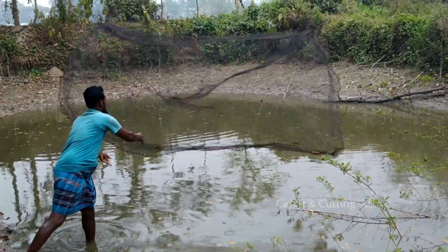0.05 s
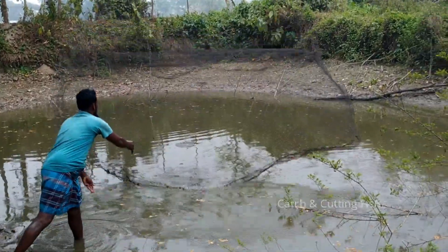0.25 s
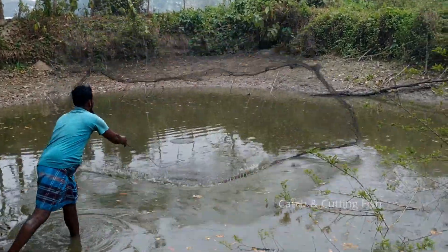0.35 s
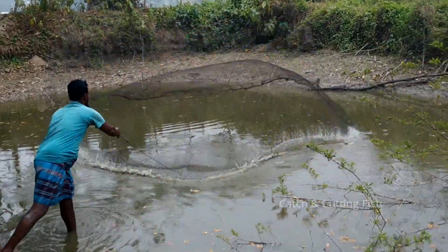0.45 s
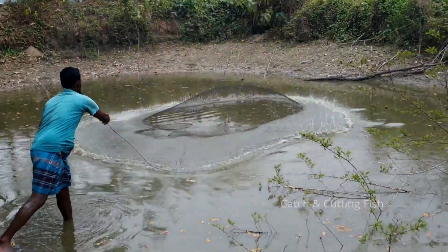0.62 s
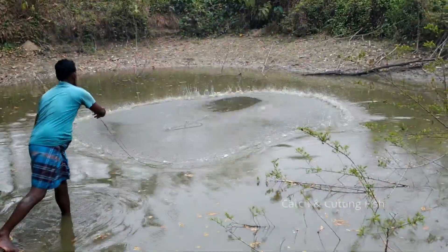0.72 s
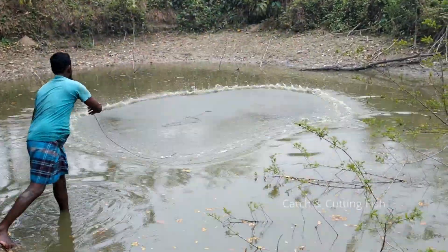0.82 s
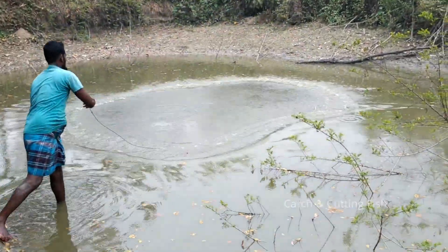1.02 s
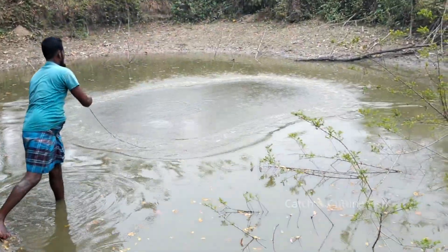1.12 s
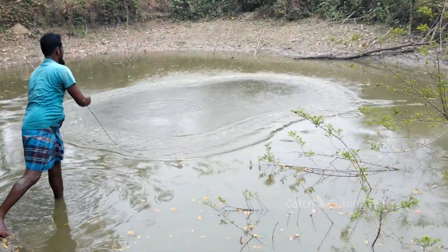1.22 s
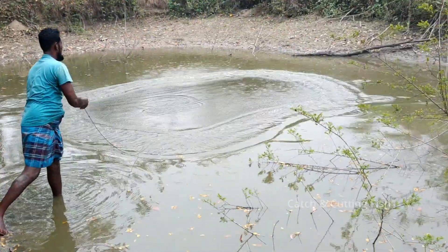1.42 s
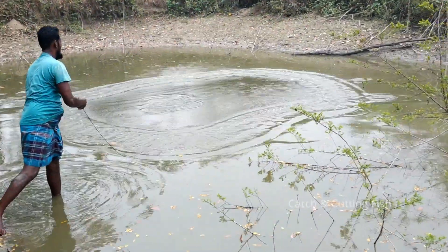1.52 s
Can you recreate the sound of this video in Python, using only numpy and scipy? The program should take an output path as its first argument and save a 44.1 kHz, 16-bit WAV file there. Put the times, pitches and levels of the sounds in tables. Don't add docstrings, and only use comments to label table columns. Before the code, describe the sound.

A thrown fishing net lands on a pond: bright droplet hiss and flat slaps over dense mid-pitched bubbling, fading to scattered plops and ticks, outdoors with faint bank echoes, small stereo recorder, left side duller.

```python
import sys
import numpy as np
from scipy import signal
from scipy.fft import rfft, irfft
from scipy.io import wavfile

SR = 44100
rng = np.random.default_rng(int(sys.argv[2]) if len(sys.argv) > 2 else 0)


def boost_factor(decibels):
    exponent = np.asarray(decibels, float) / 20
    return 10 ** exponent


def store_wav(level_fs):
    pcm = np.round(np.clip(np.atleast_2d(level_fs), -1, 1) * 32767)
    wavfile.write(sys.argv[1], SR, pcm.T.astype(np.int16))


N = 68355
LEFT_LAG_S = 0.00023


def in_time(rows):
    s, *columns = np.transpose(rows)
    return [np.interp(np.arange(N) / SR, s, column) for column in columns]


def at_hz(points, hz):
    table_hz, value = np.array(points).T
    return np.interp(np.log(np.maximum(hz, 1)), np.log(table_hz), value)


def rms_one(x):
    return x / np.sqrt(np.mean(x ** 2) + 1e-20)


def drift(rate):
    r = np.exp(-2 * np.pi * rate / SR)
    wander = signal.lfilter([1], [1, -2 * r, r * r], rng.standard_normal(N + SR))
    return rms_one(wander[SR:])


def coloured(x, spectrum):
    weight = boost_factor(at_hz(spectrum, np.fft.rfftfreq(N, 1 / SR)))
    return rms_one(irfft(rfft(x) * weight, N))


def brightened(x, db_per_octave, pivot_hz):
    hz = np.fft.rfftfreq(N, 1 / SR)
    octave, spectrum = np.log2(np.maximum(hz, 1) / pivot_hz), rfft(x)
    centres = [-1.5, -.5, .5, 1.5]
    out = 0
    for centre, corner in zip(centres, np.eye(4)):
        part = irfft(spectrum * np.interp(octave, centres, corner), N)
        out = out + boost_factor(centre * db_per_octave) * part
    return out


# frequency in Hz, left-right correlation (0 to 1).
PORT_LIKENESS = [(60, 0.8), (300, 1), (700, 0.66), (1400, 0.099), (3000, 0.19), (15000, 0.047)]


def noise(spectrum, patchy_db, rate):
    out, together = 0, drift(rate * 2)
    edges = 30 * 2 ** np.arange(0, 9.6, .5)
    white = rng.standard_normal((2, 2, N))
    for k, (low, high) in enumerate(zip(edges, np.minimum(edges[1:], .45 * SR))):
        band = signal.butter(2, [low, high], "band", fs=SR, output="sos")
        mid, side = signal.sosfilt(band, white[k % 2])
        alike = np.clip(at_hz(PORT_LIKENESS, np.sqrt(low * high)), 0, 1)
        stereo = np.sqrt(1 + alike) * mid + np.sqrt(1 - alike) * side * [[1], [-1]]
        flicker = boost_factor(patchy_db * (0.68 * together + drift(rate)))
        out = out + flicker * stereo
    return coloured(out, spectrum)


def grains(per_s, low_hz, high_hz, cycles, spread_db, spectrum, count=24):
    size = boost_factor(spread_db * np.minimum(rng.exponential(1, N), 4)) * rng.choice([-1, 1], N)
    born = size * (rng.random(N) < per_s * boost_factor(2 * drift(60)) / SR)
    dealt = rng.integers(0, count, N)
    lags = rng.integers(-7, 8, count)
    out = np.zeros((2, N))
    for k, hz in enumerate(np.geomspace(low_hz, high_hz, count)):
        r, w = boost_factor(-60 * hz / (cycles * SR)), 2 * np.pi * hz / SR
        clicks = born * (dealt == k) + 1e-18
        rung = signal.lfilter([1, 0, -1], [1, -2 * r * np.cos(w), r * r], clicks)
        out += np.sqrt(hz) * np.array([np.roll(rung, lags[k]), rung])
    return coloured(out / np.sqrt(high_hz), spectrum)


def bubbles(rows, cycles, rise, attack_cycles):
    out = np.zeros(N + SR)
    for s, db, hz in rows:
        turns = np.arange(int(cycles * SR / hz)) * hz / SR
        shape = (1 - np.exp(-turns / attack_cycles)) * boost_factor(-60 * turns / cycles)
        ring = shape / shape.max() * np.sin(2 * np.pi * turns * (1 + rise * turns))
        i = int(s * SR)
        out[i:i + len(turns)] += boost_factor(db) * ring
    return out[:N]


# frequency in Hz, spectral level in dB per Hz.
AIR_COLOUR = [(30, -100), (90, -10), (190, 5), (330, -6), (850, -12), (1600, -13.5), (2250, -5),
              (4500, -15.5), (16500, -37.5)]
# frequency in Hz, left minus right in dB before the ports.
AIR_LEAN = [(300, 0), (1200, 2), (2250, 10.5), (3200, 0), (4700, 0), (9000, 13)]


def air():
    left_db = at_hz(AIR_LEAN, np.fft.rfftfreq(N, 1 / SR))
    lean = boost_factor(np.outer([.5, -.5], left_db))
    return boost_factor(-48.5) * irfft(rfft(noise(AIR_COLOUR, patchy_db=1.4, rate=11.4)) * lean, N)


# start in seconds, peak level in dB, pitch in Hz.
LEG_GULPS = [
    (.03, -43.5, 209),
    (.075, -44.5, 293),
    (.1, -44.5, 405),
    (.64, -43.5, 185.4),
    (1.08, -50, 221),
]


def gulps():
    return bubbles(LEG_GULPS, cycles=33.0, rise=0.0234, attack_cycles=0.59)


# start in seconds, level in dB, centre frequency in Hz, decay in seconds.
DROPLET_TICKS = [(.207, -51, 12000, .008), (.223, -43, 6100, .006), (.251, -33.5, 7000, .003),
                 (0.287, -31, 3000, .003), (.356, -34, 5000, 0.0038), (.372, -32, 4800, 0.0039),
                 (0.388, -34, 5400, 0.0045), (.529, -27, 6460, .0015), (.5555, -28.5, 12900, .002),
                 (0.557, -31, 6000, 0.0057), (.576, -50, 3700, 0.0027), (.595, -36, 8900, .006),
                 (.735, -44.5, 11000, .003), (.866, -50, 6000, 0.0051), (0.909, -49, 9500, .003),
                 (1.041, -55, 6500, .004), (1.158, -53, 14000, 0.0026), (1.159, -46.5, 6800, 0.0027),
                 (1.215, -45.5, 12500, 0.0016), (1.278, -50.5, 4460, 0.012), (1.343, -52, 4940, 0.0065),
                 (1.401, -52, 6000, 0.0055), (1.477, -44.5, 12500, 0.0017), (1.496, -43, 4940, .003),
                 (1.496, -51, 8000, 0.0027), (1.536, -45, 4400, 0.0053)]


def ticks():
    out, t = np.zeros((2, N + SR)), np.arange(1200) / SR
    for s, db, hz, decay in DROPLET_TICKS:
        band = signal.butter(2, [hz / 1.4, min(hz * 1.4, .45 * SR)], "band", fs=SR, output="sos")
        burst = rms_one(signal.sosfilt(band, rng.standard_normal((2, len(t)))))
        i = int(s * SR)
        out[:, i:i + len(t)] += boost_factor(db) * burst * np.exp(-t / decay)
    return out[:, :N]


# start in seconds, peak level in dB, pitch in Hz.
BRIGHT_DROPS = [
    (.164, -36.5, 2660),
    (.232, -35, 2530),
    (1.407, -52, 2520),
    (1.484, -44, 1580),
    (1.3, -50, 2540),
    (1.484, -59, 2340),
]
# start in seconds, peak level in dB, pitch in Hz.
RINGING_DROP = [
    (1.339, -43, 2150),
]


def drops():
    ringing = bubbles(RINGING_DROP, cycles=230, rise=.0001, attack_cycles=6)
    centred = np.array([np.roll(ringing, -int(LEFT_LAG_S * SR)), ringing])
    return centred + bubbles(BRIGHT_DROPS, cycles=84.0, rise=0.00023, attack_cycles=7.3)


# start in seconds, level in dB, decay in seconds.
RIM_SLAPS = [
    (0.287, -30.5, 0.02),
    (0.354, -34.5, 0.012),
    (0.576, -36, 0.022),
    (0.626, -36.5, 0.043),
    (.849, -57, 0.0072),
    (0.883, -33.5, 0.0074),
    (1.151, -43, 0.0067),
    (1.275, -55, 0.045),
    (1.492, -39.5, 0.0091),
    (1.532, -50.5, 0.017),
]


def slaps():
    t = np.arange(N) / SR
    level = 0
    for s, db, decay in RIM_SLAPS:
        onset = np.clip((t - s) / 0.0024, 0, 1)
        level = level + boost_factor(db) * onset * np.exp(-np.maximum(t - s, 0) / decay)
    colour = [(700, -25), (1600, -2), (2500, -1), (4500, -9), (9000, -30)]
    return level * noise(colour, patchy_db=1.2, rate=40.0)


# time in seconds, level in dB, brightness in dB per octave.
SPRAY_COURSE = [(0, -53.5, 0), (.2, -58.5, -2), (.225, -44.5, 3), (.255, -36.5, 2.5), (.28, -39, 1.8),
                (.36, -36.5, 1), (.41, -38, 3), (.49, -41, 0.8), (.546, -38, 2.5), (.556, -33, 4.5),
                (.605, -35.5, 4.5), (.63, -39.5, -1), (.71, -46.5, 2.5), (.8, -49, -0.5),
                (.885, -47.5, 0.5), (.99, -52, -1.5), (1.2, -57.5, 2.5), (1.47, -57, -1), (1.485, -51.5, 2),
                (1.55, -48, -0.5)]
# frequency in Hz, spectral level in dB per Hz.
SPRAY_SPECTRUM = [(900, -17), (1400, -4), (2500, -2), (3100, -4), (4000, -2.5), (7500, -10.5), (12000, -15),
                  (16500, -20)]


def spray():
    level_db, tilt = in_time(SPRAY_COURSE)
    hiss = boost_factor(0.5) * noise(SPRAY_SPECTRUM, patchy_db=1.5, rate=19.0)
    fizz = boost_factor(-4.5) * grains(5000, 1250, 12800, cycles=3.6, spread_db=7.8, spectrum=SPRAY_SPECTRUM)
    return boost_factor(level_db) * brightened(hiss + fizz, tilt, pivot_hz=6660)


# time in seconds, level in dB, brightness in dB per octave.
PLUNGE_COURSE = [(0, -50, -4), (.2, -60, 2), (.281, -36.5, 6), (.285, -30, -4.5), (.34, -31.5, 4.5),
                 (.4, -34.5, 2), (.45, -31, 4), (.5, -28, 4), (.545, -36, 9), (.56, -29, 2),
                 (.642, -28.5, -0.5), (.69, -48, 13.5), (.78, -48, 11.5), (.86, -34, 3.5), (.92, -41.5, 0),
                 (.95, -48, 10), (1.15, -50.5, -1), (1.22, -70, 0)]
# frequency in Hz, spectral level in dB per Hz.
PLUNGE_SPECTRUM = [(130, -42), (220, -10.5), (341, -23), (384, -14), (686, -6), (835, -8.5), (1110, -9),
                   (1540, -17.5), (3000, -25), (3900, -66), (6600, -120)]


def plunge():
    level_db, tilt = in_time(PLUNGE_COURSE)
    wash = boost_factor(-8) * noise(PLUNGE_SPECTRUM, patchy_db=-2.0, rate=36.0)
    crowd = boost_factor(-15) * grains(500, 356, 2360, cycles=24, spread_db=3.6, spectrum=PLUNGE_SPECTRUM)
    return boost_factor(level_db) * brightened(wash + crowd, tilt, pivot_hz=796)


# start in seconds, peak level in dB, pitch in Hz.
FLIGHT_PLOPS = [
    (0, -49, 645),
    (.027, -54, 544),
    (.04, -47, 674),
    (.22, -48, 536),
    (.26, -44.5, 616),
    (0.523, -34, 483),
    (.588, -35.5, 573),
]
# start in seconds,
# peak level in dB, pitch in Hz.
SINGLE_PLOPS = [(0.281, -33, 784), (0.288, -34, 1170), (0.303, -40.5, 530), (0.304, -36.5, 717),
                (0.307, -32, 1050), (0.32, -35.5, 733), (0.329, -33, 1132), (0.332, -33.5, 548),
                (0.335, -39, 728), (0.342, -42.5, 390), (0.347, -36, 1313), (0.349, -35, 874),
                (0.36, -36, 1424), (0.364, -42, 1050), (0.364, -37.5, 680), (0.371, -40, 904),
                (0.384, -36.5, 1096), (0.39, -38, 650), (0.395, -45, 426), (0.396, -39.5, 1220),
                (0.397, -37, 1010), (0.407, -40, 710), (0.42, -34.5, 1073), (0.424, -39, 488),
                (0.434, -31, 1112), (0.446, -33.5, 686), (0.456, -42, 1100), (0.469, -34.5, 1246),
                (0.47, -29.5, 654), (0.482, -28.5, 575), (0.492, -43, 1220), (0.493, -39, 1020),
                (0.498, -32, 554), (0.505, -35, 777), (0.513, -41, 1267), (0.522, -38.5, 1302),
                (0.532, -38, 1127), (0.532, -33, 691), (0.548, -49, 1135), (0.551, -29.5, 708),
                (0.564, -35, 1123), (0.577, -25.5, 687), (0.581, -46, 1210), (0.596, -35.5, 670),
                (0.601, -38.5, 1220), (0.61, -35, 1025), (0.612, -40, 1600), (0.621, -34.5, 695),
                (0.624, -42, 1550), (0.63, -39, 913), (0.632, -31, 552), (0.634, -37.5, 1237),
                (0.663, -33.5, 607), (0.668, -46, 950), (0.675, -49, 1270), (0.678, -41.5, 603),
                (0.683, -49, 1090),
                (0.698, -57, 1330), (0.703, -51, 655), (0.718, -42, 1177), (0.736, -43, 1216),
                  (0.764, -50, 1000), (0.774, -45.5, 740), (0.797, -47, 1324), (0.806, -52, 1270),
                  (0.809, -41, 936), (0.816, -41, 539), (0.827, -47, 495), (0.829, -49.5, 714),
                  (0.844, -47, 693), (0.849, -41.5, 1164), (0.856, -41.5, 1030), (0.862, -47, 742),
                  (0.862, -42.5, 538), (0.871, -47, 780), (0.88, -44, 477), (0.884, -40.5, 1240),
                  (0.886, -51, 684), (0.888, -43.5, 940), (0.905, -40, 602), (0.916, -41, 815),
                  (0.936, -48.5, 1040), (0.955, -47.5, 915), (0.963, -49, 733), (0.984, -45, 610),
                  (0.994, -44.5, 1195), (1.007, -45, 454), (1.019, -41, 527), (1.066, -47.5, 700),
                  (1.072, -39.5, 1124), (1.144, -47.5, 640)]
# start in seconds, peak level in dB, pitch in Hz.
CLIMBING_PLOP = [
    (.907, -39, 570),
]


def plops():
    rows = []
    for s, db, hz in FLIGHT_PLOPS + SINGLE_PLOPS:
        rows.append((s, db + 6.0 * np.log2(hz / 650), hz))
    steady = boost_factor(-1) * bubbles(rows, cycles=38, rise=0.0012, attack_cycles=2.5)
    return steady + bubbles(CLIMBING_PLOP, cycles=62, rise=.024, attack_cycles=4)


def bank_echoes(water):
    echoes = np.zeros((2, N))
    for k, delay_s in enumerate([.031, 0.051, 0.07]):
        late = np.pad(water[::(-1) ** k], ((0, 0), (int(delay_s * SR), 0)))
        echoes += late[:, :N]
    return boost_factor(-16.5) * signal.lfilter([.4], [1, -.6], echoes)


def scene():
    water = gulps() + ticks() + drops() + slaps() + spray() + plunge() + plops()
    return air() + bank_echoes(water) + water


def low_pass(x):
    return signal.sosfilt(signal.butter(12, 16660, fs=SR, output="sos"), x)


# frequency in Hz, left minus right in dB.
PORT_SHADE = [(60, -1.5), (130, -2.5), (290, -3.5), (640, -3), (1410, -3.5), (3100, -2), (4700, -6.5),
              (6820, -13), (15000, -13.5)]


def record(dry):
    size = N + 64
    hz = np.fft.rfftfreq(size, 1 / SR)
    half = boost_factor(at_hz(PORT_SHADE, hz) / 2)
    left = half * np.exp(-2j * np.pi * hz * LEFT_LAG_S)
    top_cut = 1 + (hz / 15900) ** 200
    ports = np.array([left, 1 / half]) / top_cut
    heard = irfft(rfft(dry, size) * ports, size)[:, :N]
    return low_pass(heard)


dry = scene()
out = record(dry)
store_wav(out)
```